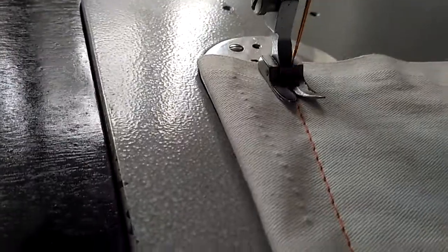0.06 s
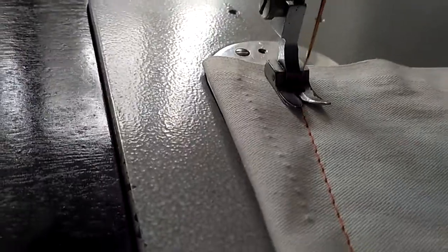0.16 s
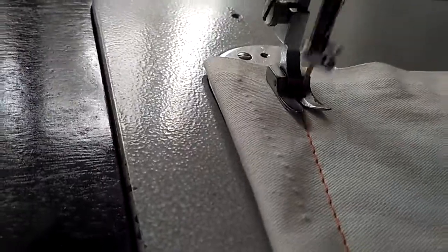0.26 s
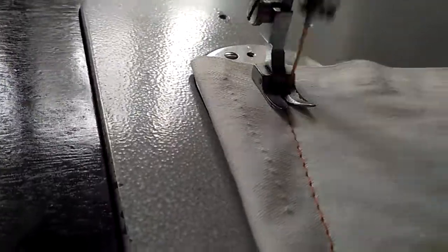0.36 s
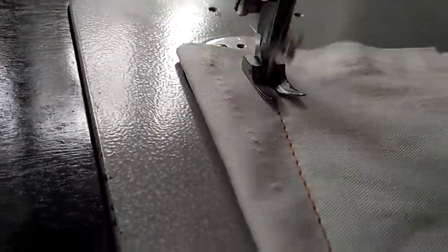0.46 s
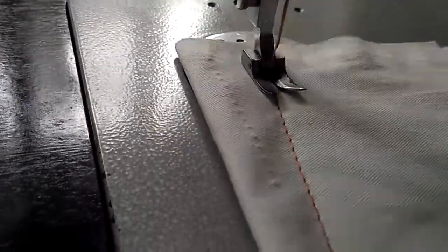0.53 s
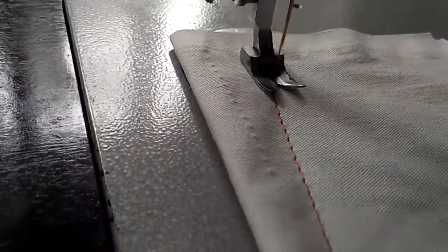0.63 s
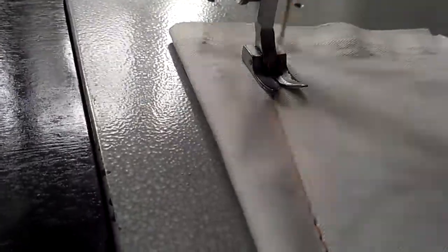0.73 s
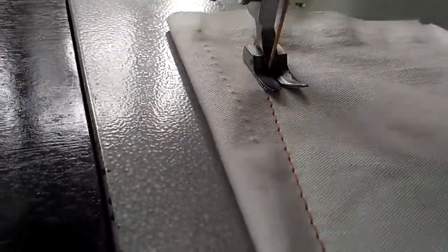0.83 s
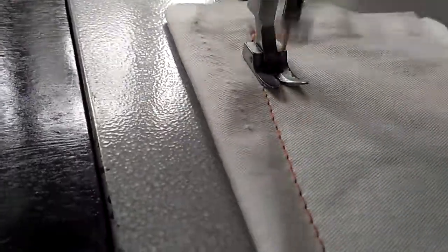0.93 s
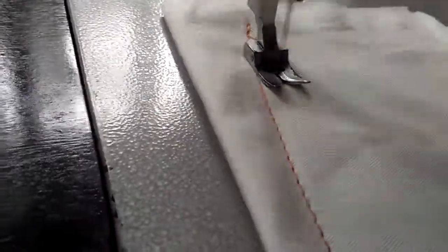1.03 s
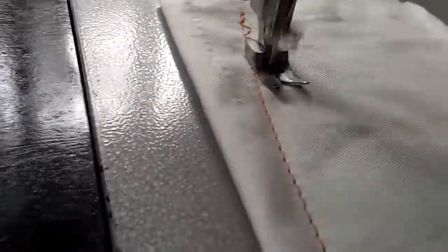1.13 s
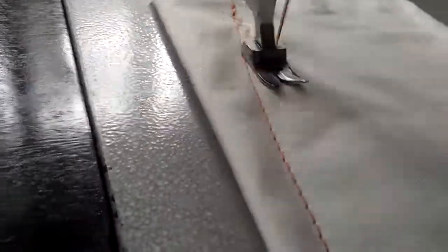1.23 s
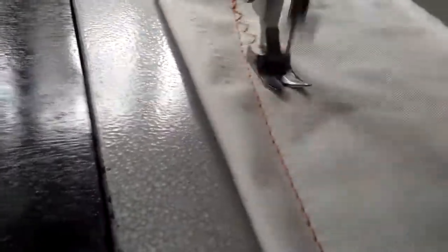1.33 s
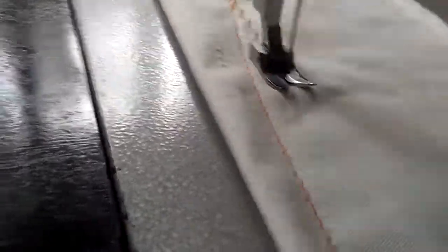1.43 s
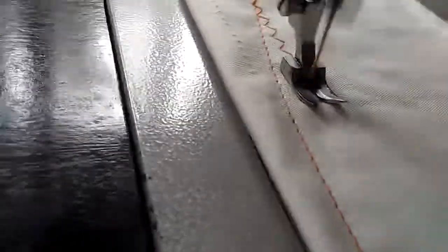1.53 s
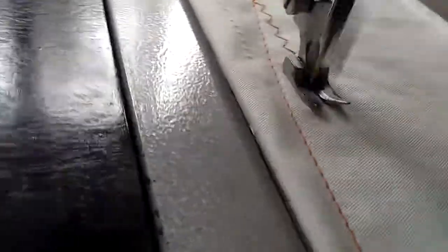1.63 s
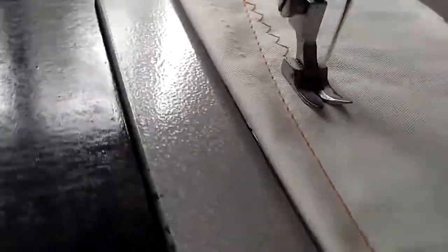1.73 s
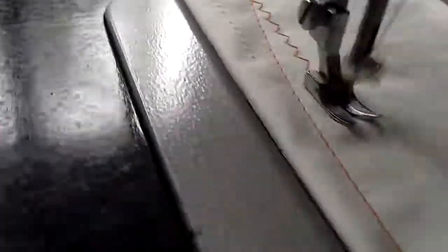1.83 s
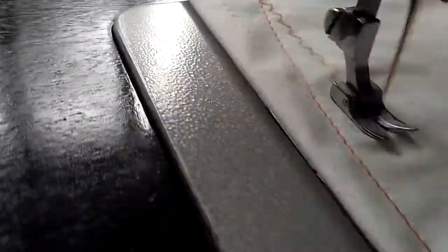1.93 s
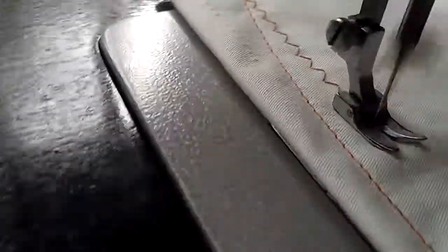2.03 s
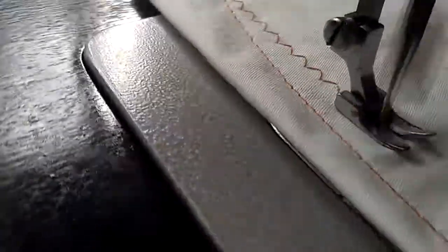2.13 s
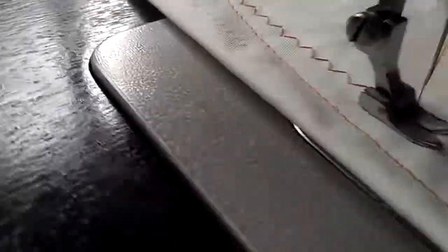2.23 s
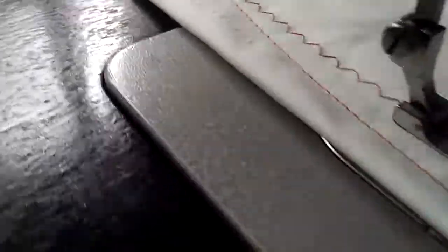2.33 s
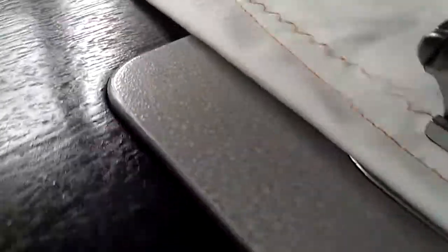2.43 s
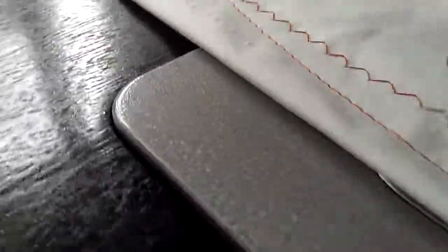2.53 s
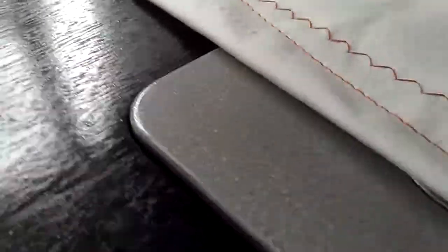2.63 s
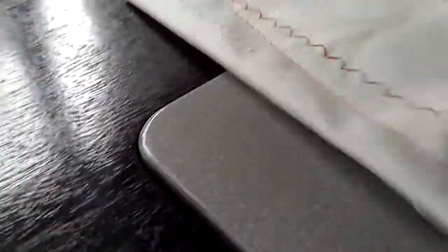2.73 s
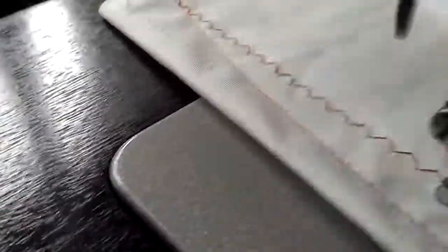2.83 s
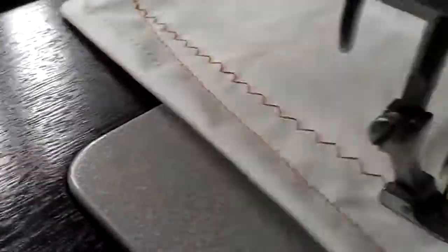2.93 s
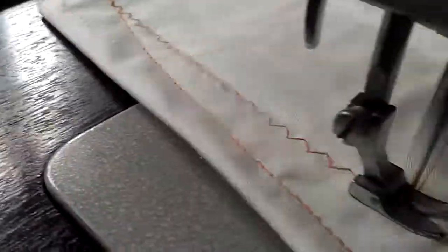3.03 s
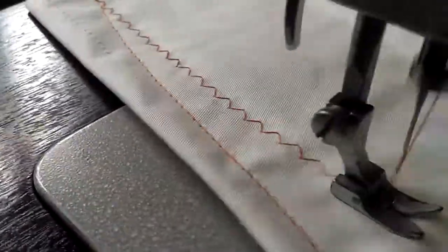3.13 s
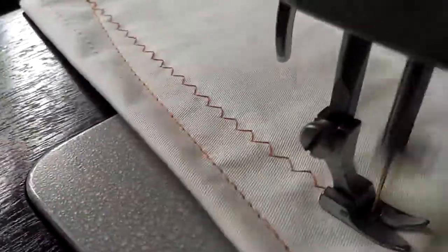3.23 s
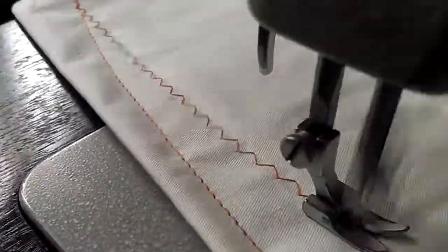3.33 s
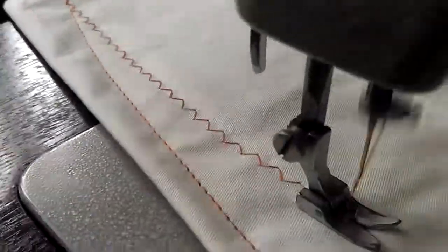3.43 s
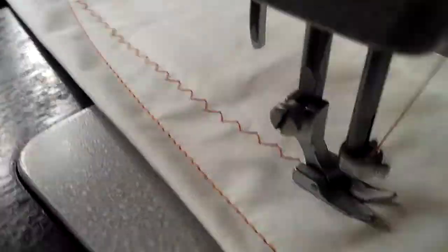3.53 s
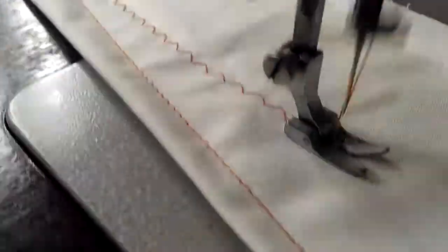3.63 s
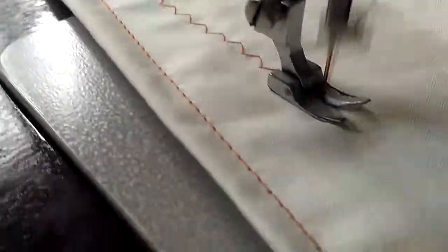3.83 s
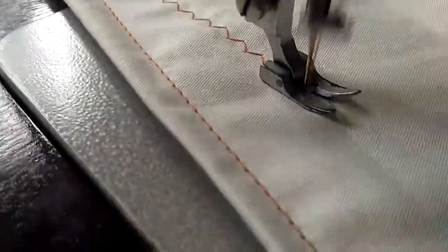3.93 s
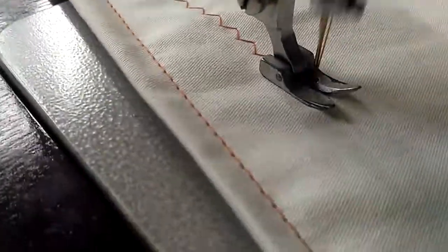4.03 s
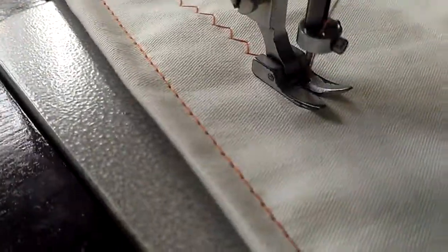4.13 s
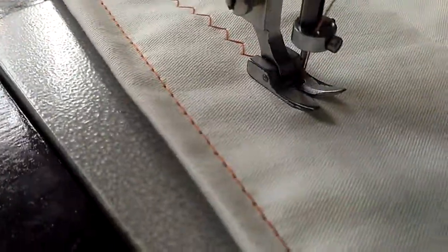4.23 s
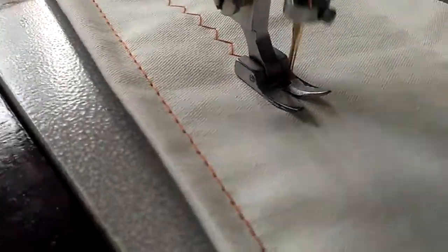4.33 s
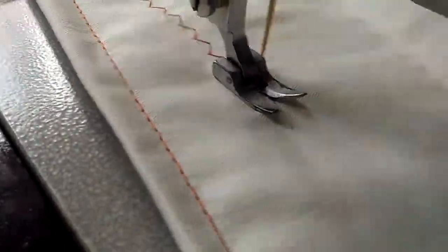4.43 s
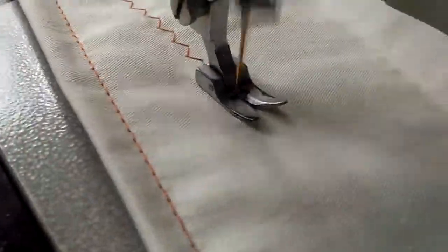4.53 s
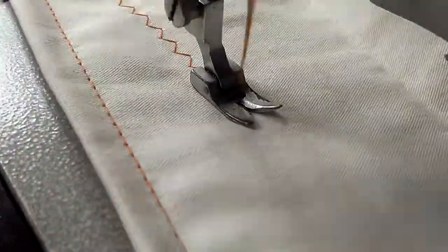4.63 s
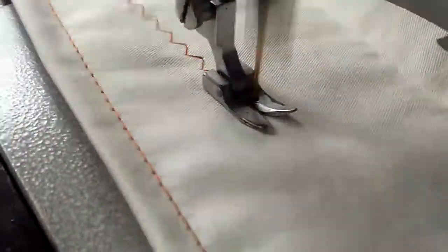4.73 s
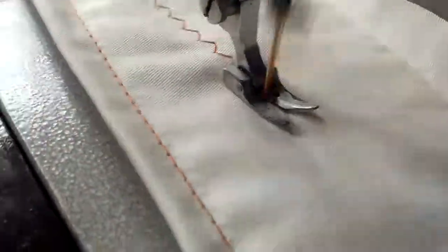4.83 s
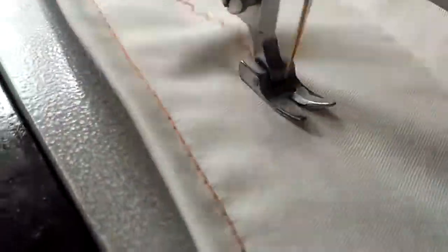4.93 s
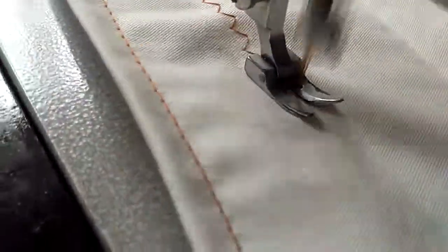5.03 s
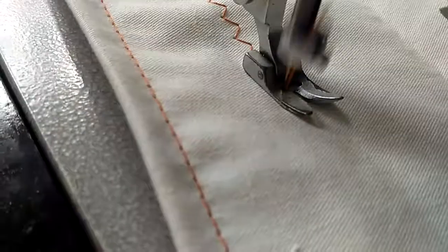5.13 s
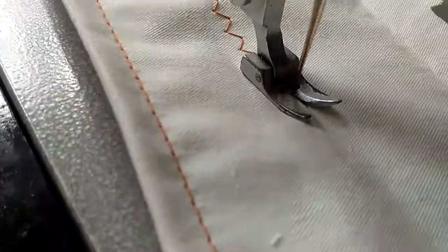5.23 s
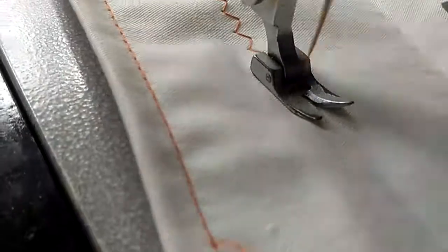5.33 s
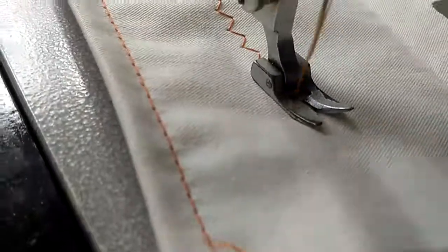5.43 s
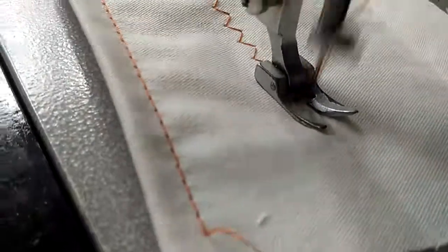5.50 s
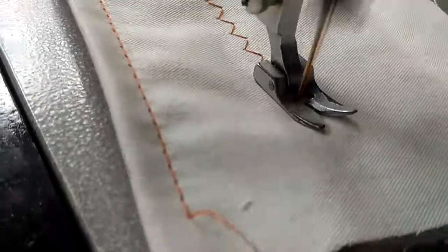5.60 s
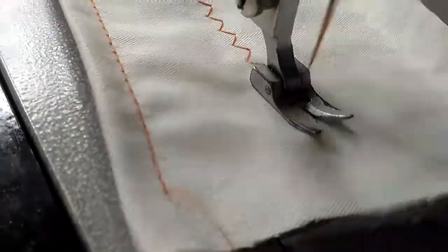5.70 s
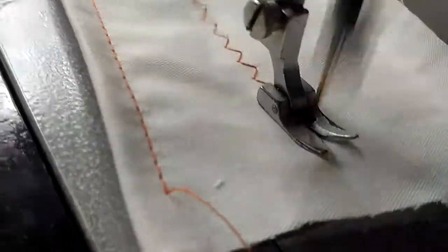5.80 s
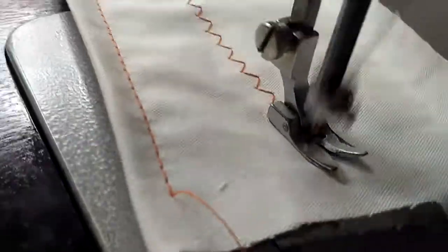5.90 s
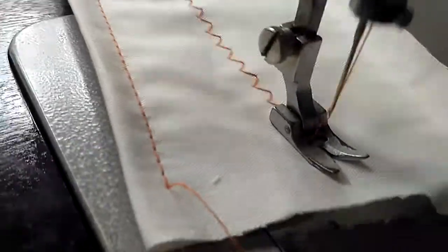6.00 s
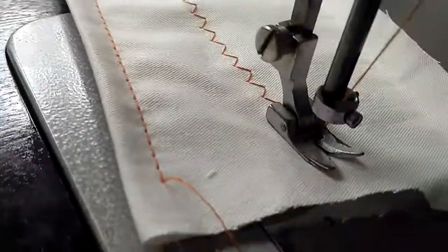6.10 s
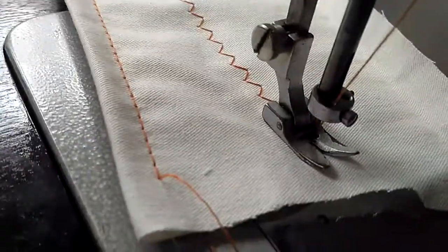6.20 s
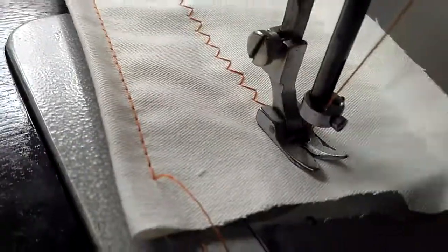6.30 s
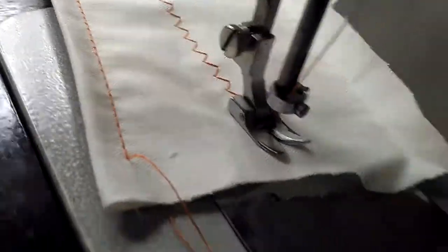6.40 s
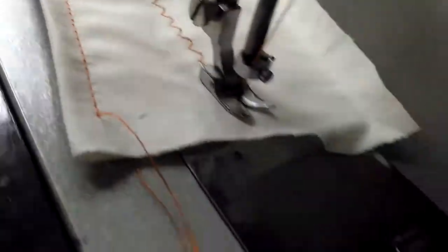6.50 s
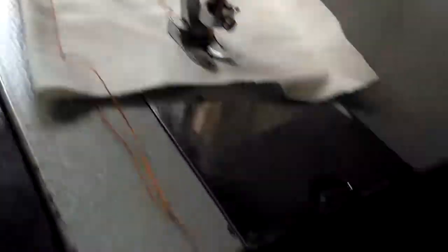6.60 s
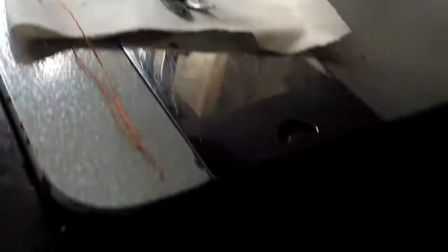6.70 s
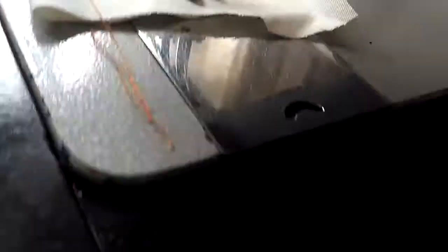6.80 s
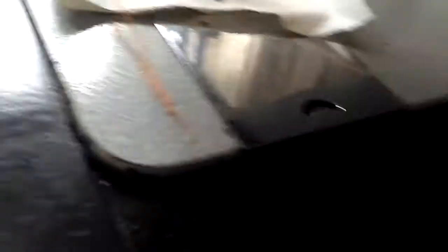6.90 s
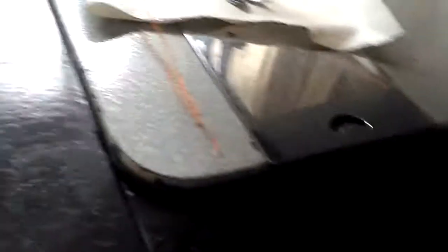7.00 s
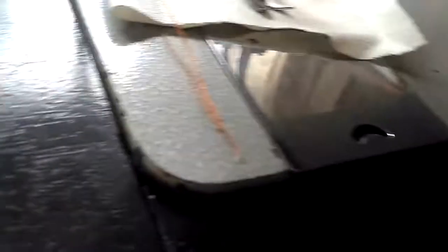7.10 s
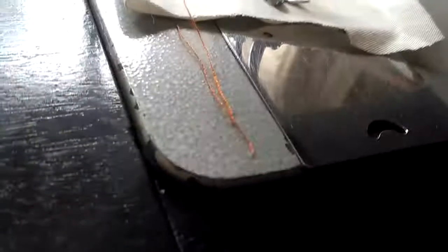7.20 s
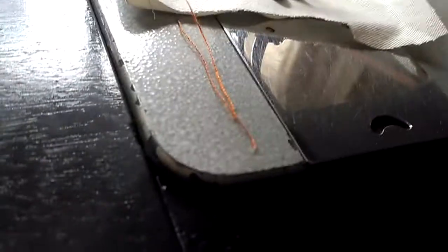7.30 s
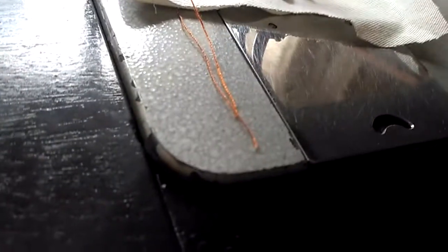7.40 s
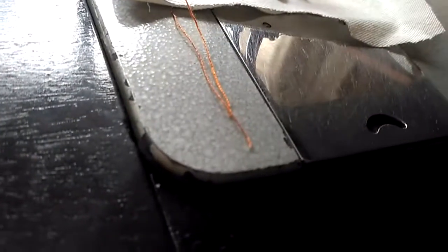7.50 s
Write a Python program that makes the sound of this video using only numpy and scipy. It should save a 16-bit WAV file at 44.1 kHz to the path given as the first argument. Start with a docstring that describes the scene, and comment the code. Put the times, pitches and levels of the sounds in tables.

```python
"""Close beside an electric sewing machine, at a hand-held phone: heavy cloth is stitched in two runs
with a short stop. Every turn of the shaft repeats a round of blows that excite the casting's modes.
Gear noise and needle bursts are modulated by the turn; the motor hums at twice the mains frequency.
Afterwards the cloth is drawn out over the bed: coloured noise with a narrow whistling band."""
import sys
import numpy as np
from scipy import signal
from scipy.fft import rfft, irfft, next_fast_len
from scipy.io import wavfile
from scipy.ndimage import uniform_filter1d, map_coordinates

SR = 44100
rng = np.random.default_rng(int(sys.argv[2]) if len(sys.argv) > 2 else 0)


def file_out(sig):
    """Save sig as 16-bit WAV at sys.argv[1]."""
    # one column per channel
    cols = np.atleast_2d(sig).T
    # limit, then scale
    lim = np.clip(cols, -1, 1)
    pcm = np.round(lim * 32767).astype(np.int16)
    wavfile.write(sys.argv[1], SR, pcm)


N = 332955
T = np.arange(N) / SR  # s

# Background colour: f/Hz, relative density/(dB per Hz)
ROOM_COLOUR = [(50, -27), (180, -3), (260, -16.5), (520, -19), (640, -13.5), (700, -4.5), (780, -17),
               (1100, -25.5), (1350, -26), (1900, -28.5), (2500, -28), (5000, -29), (7000, -40.5),
               (9500, -76)]
# Background before its random unevenness: t/s, level/dB
ROOM_LEVEL = [(0, -54), (4.201, -61), (4.33, -73), (4.45, -56), (6.301, -71), (6.6, -68), (6.82, -63),
              (6.95, -67.5), (7.545, -85)]
# Likeness of the noise at the two ports: f/Hz, correlation/1
LIKENESS = [(60, 0.87), (250, 1), (600, 0.74), (1100, 0.51), (2200, 0), (9000, 0)]
# Lean of the sound to the left: f/Hz, left-right level difference/dB
LEAN = [(60, 12.5), (190, 5), (570, 6.5), (1010, -1.5), (1780, 7.5), (3130, 4), (5500, 2), (7000, -5.5),
        (8500, -12.5)]
# Rub of the cloth: t/s, level/dB
CLOTH_LEVEL = [(6.55, -113), (6.77, -79), (6.9, -63), (6.93, -59.5), (7.0, -58.5), (7.04, -53.5),
               (7.13, -57), (7.205, -49.5), (7.28, -62.5), (7.545, -78)]
# Colour of the rubbing weave: f/Hz, relative density/(dB per Hz)
WEAVE_COLOUR = [(290, -81), (500, -33.5), (805, -3), (948, -14.5), (1130, -5.5), (2100, -3.5), (2600, 5),
                (3000, 2), (5020, 8.5), (9280, -28.5), (10000, -37.5), (13000, -64), (22000, -120)]
# Whistling band of the rub: t/s, centre f/Hz, level/dB
WHISTLE = [(6.55, 4850, -100), (6.77, 5270, -66), (6.851, 5200, -69), (7.051, 5230, -66),
           (7.281, 4750, -61.5), (7.545, 4410, -76)]
# Scrapes of the linkage at a crawl: middle t/s, width of the bell (one sigma)/s, level/dB, centre f/Hz
SCRAPES = [(0.273, 0.0078, -47, 3200), (0.343, 0.012, -42.5, 3480), (4.285, 0.01, -61.5, 2700)]
# Clicks of linkage and fingers: t/s, level before the metal's response/dB,
# t60/s (limited in use), treble raised and bass lowered by/dB
CLICKS = [(0.214, -43.5, 0.03, -3), (0.242, -40, 0.027, -3), (0.401, -29.5, 0.013, -3.5),
          (0.468, -45, 0.034, -6.5), (0.5654, -37.5, 0.031, 2), (0.596, -45, 0.034, 9),
          (3.8235, -21.5, 0.018, -1), (4.0225, -47.5, 0.074, 2.5), (4.056, -42, 0.053, -1),
          (4.133, -54, 0.075, 7), (4.2259, -48.5, 0.019, -2), (4.578, -37, 0.029, 2),
          (4.6069, -37.5, 0.11, 3.5), (5.0873, -23.5, 0.015, -1.5), (5.4198, -27.5, 0.017, -1),
          (5.4839, -36, 0.05, 3.5), (5.5414, -30.5, 0.028, -1), (5.599, -34, 0.039, 1.5),
          (5.6968, -36.5, 0.14, 5), (6.1378, -47, 0.078, 5), (6.171, -50, 0.046, 10),
          (6.251, -59, 0.048, 0), (6.442, -62.5, 0.14, 0.5), (6.928, -51, 0.21, -0.5)]
# Knocks and pings of frame and hand: t/s, level before halving and lean/dB, f/Hz, t60/s
BUMPS = [(.399, -20, 1950, 0.011), (4.023, -31, 2610, 0.046), (4.134, -31, 491, 0.091),
         (4.19, -20.5, 1910, 0.012), (6.254, -52, 1500, .04), (6.296, -46, 970, 0.046),
         (6.344, -43, 130, 0.091), (6.35, -73, 1540, 0.13), (6.398, -61, 725, .05), (6.4, -54.5, 2220, .02),
         (6.441, -54, 697, .1), (6.442, -44, 169, 0.14), (6.595, -51, 675, 0.093), (6.641, -47, 208, 0.13),
         (6.716, -39, 168, 0.1), (6.802, -25, 188, 0.063), (6.806, -32.5, 386, 0.052),
         (6.817, -29, 209, 0.069), (6.927, -48, 407, 0.12), (7.136, -48, 166, 0.097)]
# Stray pings of loose parts in the runs: t/s, level before halving and lean/dB, f/Hz
PINGS = [(1.9196, -21.5, 4530), (2.7245, -26.5, 4210), (2.896, -21.5, 2570), (2.9047, -21, 4280),
         (3.348, -24.5, 2780), (3.4416, -24.5, 4140), (4.8724, -21, 4230), (4.9762, -20, 3140),
         (5.045, -20.5, 2940), (5.1203, -22, 3200), (5.203, -25.5, 2660)]
PING_T60 = 0.052  # s
# Motor hum, one table a run: t/s, level before the final scale and lean/dB
HUM_LEVEL = [
    [(0, -60), (.15, -41.5), (.7, -38.5), (1.25, -32.5), (1.5, -40), (2.4, -48), (3.6, -50), (4.3, -66.5)],
    [(4.35, -64), (4.41, -37), (4.46, -44), (4.5, -35.5), (4.77, -29.5), (5.05, -50), (5.31, -31.5),
     (5.34, -40), (5.5, -45), (5.72, -36.5), (6.07, -40.5), (6.25, -58)],
]
# Pedal pressed, rotor not yet turning: t/s, swell time/s, reference level of the rattle/dB
STALLS = [(0, .12, -46.5), (4.365, 0.056, -48)]
# Low and high rattle of the core: level over the reference/dB, swell/dB, fade/(dB per s)
RATTLE = [(2.5, 8.5, 215), (0.5, 15, 556)]
# Low and high resonances of the core: f/Hz, t60/s, relative level/dB
CORE_MODES = [
    [(510, 0.023, 1), (935, 0.059, 10.5), (1085, 0.038, -6.5)],
    [(1696, .016, 5), (1930, 0.046, 0.5), (2040, 0.03, 3)],
]
# Shaft speed, one table a run: t/s, speed/(turns per s)
SHAFT_SPEED = [
    [(0.1, 7.056), (0.376, 6.21), (0.645, 6.572), (0.961, 12.963), (1.19, 14.745), (1.498, 15.701),
     (2.085, 15.819), (2.607, 16.267), (2.963, 16.356), (3.107, 17.813), (3.336, 16.65), (3.628, 15.978),
     (3.843, 14.67), (3.993, 12.849), (4.053, 7.301), (4.299, 1.648)],
    [(4.45, 5.4), (4.733, 8.4), (4.838, 17.52), (4.901, 12.94), (4.994, 14.32), (5.353, 10.01),
     (5.487, 6.23), (5.729, 12.13), (5.991, 12.95), (6.084, 7.45), (6.3, 0.76)],
]
# Loudness of the linkage, one table a run; sets the gains of all parts: t/s, level/dB
LINKAGE_LEVEL = [
    [(.18, -65), (.25, -47.5), (.44, -54.5), (.48, -47), (.7, -37), (1, -30.5), (1.5, -27), (2.5, -32),
     (3.1, -32), (3.7, -37.5), (4.0, -42.5), (4.1, -56.5), (4.22, -57), (4.35, -86.5)],
    [(4.55, -60), (4.61, -39), (4.87, -27), (5.12, -29), (5.33, -36), (5.5, -38.5), (5.85, -29.5),
     (6.05, -36.5), (6.12, -49), (6.2, -59), (6.3, -84)],
]
FULL_LEVEL = -35  # dB, linkage level to which the part levels refer
# Balance of the parts as the phone wanders: t/s, first drift/1, second drift/1
DRIFT = [(0.5, 0.18, -0.058), (1, 0.59, 0.11), (1.9, 0.33, 0.33), (2.15, -0.28, -0.13), (2.4, -0.34, -0.86),
         (2.749, -1.18, 0.1), (3.2, -0.63, 0.85), (3.6, -0.22, -0.37), (3.78, 1.05, -0.52),
         (3.92, 0.23, -0.24), (4.6, 0.35, -0.31), (5.1, 0.14, 0.069), (5.25, 0.27, 0.004),
         (5.8, 0.57, 0.081), (6.099, 0.63, -0.34)]
# Bed, arm, head, cover plate, hook, needle: gain at FULL_LEVEL/dB, growth/(dB per dB of linkage),
# dB per first drift, dB per second drift
PARTS = [(-28.5, 0.71, -2.5, -3.5), (-39.5, 0.8, 4.5, -3), (-41.5, 0.56, -4.5, 6.5), (-40.5, 0.82, -9, -2),
         (-37.5, 0.6, -4.5, 2.5), (-54, 1.16, 0.7, -3.5)]
# Below the steady speed the linkage moves in two lurches a turn:
# steady speed/(turns per s), depth at standstill/dB, share of the turn/1
STEADY_SPEED, LURCH_DEPTH, LURCH_SHARE = 7.1, 7.5, 0.16
# Once a turn the linkage runs unloaded and falls quiet:
# middle and width (one sigma) as shares of the turn/1, depth/dB
SLACK_SHARE, SLACK_WIDTH, SLACK_DEPTH = 0.56, 0.042, -1
# Gear noise colour: f/Hz, relative density/(dB per Hz)
GEAR_COLOUR = [(140, -24.5), (230, -6.5), (440, -29.5), (516, -3.5), (817, -11.5), (972, -5), (1330, -15),
               (3190, -10.5), (6610, -21), (9070, -59.5), (10100, -79.5), (22000, -120)]
# Needle burst colour: f/Hz, relative density/(dB per Hz)
NEEDLE_COLOUR = [(4500, 0), (6500, 4), (7400, -4), (8050, -20), (8900, -10), (10000, -39.5)]
# Casting modes: f/Hz, t60/s
CASTING_MODES = [(125, 0.0064), (339, 0.059), (517, 0.045), (976, 0.1), (1480, 0.023), (2070, 0.004),
                 (2670, 0.017), (3200, 0.0046), (3900, 0.022), (4600, 0.0039), (5500, 0.0018),
                 (7000, 0.006)]
# Blows of one turn: share of the turn/1, then relative level in each casting mode/dB
BLOWS = [(-.02, -5, -2, -2.5, -25, -0.5, 0.5, -7, -8, -10.5, -10, -3, 27.5),
         (0.134, -22, -15, -7, -20.5, 1, 4, -20.5, -16.5, 2, 0, 5.5, 20.5),
         (.29, -22, -4, -11, -24, -6, -8, -10, 3.5, 6.5, -21.5, 3.5, -11),
         (0.562, -13.5, -9, -13.5, 0.5, 0.5, 13, -10, -21.5, -24.5, -20.5, -16.5, -35),
         (0.722, -10, -21, -8.5, -7.5, -3.5, -12, -10.5, -22, -21, -24.5, 5, -15),
         (.81, -22, -1.5, -13, -3.5, 5.5, 9, -2, -1.5, 1, -3.5, 3.5, 5)]
PITCH_WANDER = 0.014  # relative scale by which each mode's frequency strays
# Place of the thump in the turn: t/s, share of the turn/1
THUMP_SHARE = [(.5, 0.45), (1.2, 0.24), (2.1, 0.28), (3.4, 0.15), (4.1, 0.2), (4.9, 0.438), (5.2, 0.39),
               (5.6, .27)]
THUMP_GROWTH = 0.57  # dB per (turn per s): the bed flexes harder the faster the shaft turns
TOP_F, BASS_F = 10300, 66  # Hz, upper band limit and bass corner of the phone


def amp(db):
    """Level to amplitude: 20 dB is a factor of ten."""
    return 10 ** (np.asarray(db) / 20)


def unit(x):
    """Normalisation to unit rms."""
    return x / np.sqrt(np.mean(np.abs(x) ** 2) + 1e-20)


def along(points, hz):
    """Interpolation of a spectrum on a logarithmic frequency axis."""
    f, value = np.transpose(points)
    return np.interp(np.log(hz + 1), np.log(f + 1), value)


def levels(tables):
    """Envelope: sum of the tables' amplitudes, at -120 dB outside each table."""
    gain = np.zeros(N)
    for table in tables:
        t, db = np.transpose(table)
        gain += amp(np.interp(T, t, db, -120, -120))
    return gain


def wobble(rate):
    """Band-limited fluctuation: a smooth curve through random knots, rate knots a second."""
    knots = rng.standard_normal(int(N * rate / SR) + 4)
    return map_coordinates(knots, [np.arange(N) * rate / SR])


def filtered(x, response):
    """Linear filtering: the spectrum times a response of frequency."""
    m = next_fast_len(N + 8192)
    return irfft(rfft(x, m) * response(np.fft.rfftfreq(m, 1 / SR)), m)[..., :N]


def sides(db):
    """Interaural-style level difference: left and right gains db apart."""
    return amp(np.array([db / 2, -db / 2]))


def rush(colour, pair):
    """Partial coherence: two noises, coloured, mixed to the ports' likeness and lean; mid rms 1."""
    def turn(hz):
        return np.arccos(np.clip(along(LIKENESS, hz), -1, 1)) / 2

    def mix(hz):
        return amp(along(colour, hz)) * [np.cos(turn(hz)), np.sin(turn(hz))]

    mid, side = filtered(pair, mix)
    both = filtered(np.array([mid + side, mid - side]), lambda hz: sides(along(LEAN, hz)))
    return both / np.std(both.mean(0))


def patchy(patchy_db):
    """Non-stationary noise: two noises uneven in shared patches of pitch and time."""
    z = signal.stft(rng.standard_normal((2, N)), nperseg=512)[2]
    field = uniform_filter1d(rng.standard_normal(z.shape[1:]), size=4, axis=0)
    field = uniform_filter1d(field, size=10, axis=1)
    return signal.istft(z * amp(patchy_db * unit(field)), nperseg=512)[1][:, :N]


def ring(drive, hz, t60, rise, wander=0):
    """Modal resonance: a complex drive through a decay and an onset of rise seconds, phase drifting."""
    for decay in (np.log(1000) / t60, 1 / rise):
        drive = signal.lfilter([1], [1, -np.exp((2j * np.pi * hz - decay) / SR)], drive)
    return (drive * np.exp(1j * wander)).real


def shaft_speed():
    """Angular speed of the shaft in turns per second, interpolated through both runs."""
    return np.interp(T, *np.vstack(SHAFT_SPEED).T)


def turns():
    """Integration of speed to angle: a turn starts where the angle of a run passes a whole number."""
    starts = []
    for run in SHAFT_SPEED:
        angle = np.cumsum(np.interp(T, *np.transpose(run), 0, 0)) / SR
        starts.append(np.interp(np.arange(1, angle[-1]), angle, T))
    start = np.concatenate(starts)
    return start, np.clip(np.diff(start, append=8), 0, .15)  # lengths in s


def turn_count():
    """Shaft phase: the count of turns with their fractions, by interpolation between turn starts."""
    start = turns()[0]
    return np.interp(T, start, np.arange(len(start)))


def parts():
    """Level scaling: bed, arm, head, plate, hook, needle follow the linkage, given last, and the drift."""
    level = 20 * np.log10(levels(LINKAGE_LEVEL))
    t, first, second = np.transpose(DRIFT)
    first, second = np.interp(T, t, first), np.interp(T, t, second)
    gains = [amp(db + growth * (level - FULL_LEVEL) + a * first + b * second)
             for db, growth, a, b in PARTS]
    slowness = np.clip(1 - shaft_speed() / STEADY_SPEED, 0, 1)
    lurch = LURCH_DEPTH * slowness * np.cos(4 * np.pi * (turn_count() - LURCH_SHARE))
    return gains + [amp(level + lurch)]


def room():
    """Background noise: faint and uneven beneath the whole scene."""
    level = np.interp(T, *np.transpose(ROOM_LEVEL)) + 3 * wobble(20)
    return amp(level) * rush(ROOM_COLOUR, patchy(patchy_db=4.5))


def cloth():
    """Friction noise: the weave rubs over the bed, and a narrow band of it whistles."""
    t, hz, db = np.transpose(WHISTLE)
    phase = 2 * np.pi * np.cumsum(np.interp(T, t, hz)) / SR
    # slow noise on a gliding carrier gives a narrow band
    whistle = np.array([wobble(600), wobble(600)]) * np.cos(phase) * sides(7)[:, None]
    grain = amp(0.52 * wobble(150))
    rub = rush(WEAVE_COLOUR, grain * patchy(patchy_db=2.9)) * sides(1.2)[:, None]
    return levels([CLOTH_LEVEL])[0:] * rub + levels([np.c_[t, db]]) * unit(whistle)


def scrapes():
    """Band-limited friction: grainy noise about an octave wide under bell-shaped envelopes."""
    out = np.zeros((2, N))
    grit = amp(3.3 * wobble(270)) * rng.standard_normal((2, N))
    for middle, width, db, hz in SCRAPES:
        at = slice(round((middle - .1) * SR), round((middle + .1) * SR))
        octave = signal.butter(3, [hz / 1.35, hz * 1.35], "bandpass", fs=SR, output="sos")
        band = signal.sosfilt(octave, grit[:, at])
        out[:, at] += amp(db) * unit(band) * np.exp(-.5 * ((T[at] - middle) / width) ** 2)
    return out * sides(2.2)[:, None]


def tilted(x, db):
    """Spectral tilt: below about 3500 Hz lowered by db, above it raised by db."""
    low = signal.lfilter(*signal.butter(2, 3500, fs=SR), x)
    return low * amp(-db) + (x - low) * amp(db)


def metal(hz):
    """Resonant transmission: a rising response plus peaks at some casting modes."""
    peaks = sum(.8j * hz * 400 / (f * f - hz * hz + 400j * hz)
                for f, _ in CASTING_MODES[2::3] + CASTING_MODES[5:6])
    return 3.0 * hz / (hz + 900) + peaks


def clicks():
    """Impulsive excitation: dying noise puffs ring the metal; bumps and pings are damped sines."""
    puff, thud = np.zeros((2, N + SR)), np.zeros(N + SR)
    t = np.arange(SR // 10) / SR
    for at, db, t60, tilt_db in CLICKS:
        decay = amp(db - 60 * t / np.clip(t60, .004, .2))
        noise = rng.standard_normal((2, len(t)))
        puff[:, round(at * SR):][:, :len(t)] += decay * tilted(noise, tilt_db)
    for at, db, hz, t60 in BUMPS + [(*ping, PING_T60) for ping in PINGS]:
        decay = amp(db - 60 * t / max(t60, .004))
        onset = np.minimum(hz * t / 2, 1)  # over two cycles
        thud[round(at * SR):][:len(t)] += decay * np.sin(2 * np.pi * hz * t) * onset / 2

    def response(hz):
        return metal(hz) * sides(along(LEAN, hz)) / (1 + (hz / 6400) ** 12)

    return filtered(puff[:, :N], response) + thud[:N] * sides(7.5)[:, None]


def stall_envelope(over, swell_db, fade):
    """Growth and decay: the rattle swells at each stall, then fades at a constant dB rate."""
    out = np.zeros(N)
    for start, swell, db in STALLS:
        since = T - start
        drop = np.where(since < swell, swell_db * (1 - since / swell), fade * (since - swell))
        out += (since >= 0) * amp(db + over - drop.clip(0, 200))
    return out


def motor():
    """Magnetic forcing: the field hums near 100 Hz; in a stall the core rattles once a hum cycle."""
    phase = 2 * np.pi * np.cumsum(99 + 0.32 * wobble(11)) / SR
    hum = levels(HUM_LEVEL) * amp(2.5 * wobble(21)) * np.sqrt(2) * np.sin(phase)
    ticks = np.diff(phase // (2 * np.pi), prepend=0) * amp(2.0 * wobble(64))
    ticks = ticks + 0.064 * rng.standard_normal((2, N))
    out = hum * sides(6.5)[:, None] / 1.19
    for setting, modes in zip(RATTLE, CORE_MODES):
        core = sum(amp(db) * unit(ring(ticks, hz, t60, rise=0.00044)) for hz, t60, db in modes)
        out += stall_envelope(*setting) * unit(core)
    return out


def slack():
    """Load modulation: the linkage is briefly unloaded, and quieter, once in every turn."""
    share = turn_count() % 1
    return amp(SLACK_DEPTH * np.exp(-.5 * ((share - SLACK_SHARE) / SLACK_WIDTH) ** 2))


def gears():
    """Amplitude modulation: gear noise swells with the turn; the needle rips the weave in bright bursts."""
    turn = turn_count()
    grain = 0.73 * np.cos(2 * np.pi * (turn - .02)) + 1.5 * np.cos(6 * np.pi * (turn - .27))
    grain = amp(grain + 1.92 * wobble(300) + 1.8 * wobble(30))
    rip = 6.8 * np.cos(2 * np.pi * (turn + .01)) + 2.4 * np.cos(4 * np.pi * turn)
    rip = amp(rip + 3.9 * wobble(400))
    *_, needle, linkage = parts()
    mesh = rush(GEAR_COLOUR, unit(grain) * rng.standard_normal((2, N)))
    burst = rush(NEEDLE_COLOUR, unit(rip) * rng.standard_normal((2, N)))
    return linkage * amp(-5) * mesh + needle * amp(5.5) * burst


def casting():
    """Modal superposition: each turn's blows and a steady bearing chatter ring the casting's modes."""
    (start, length), blows = turns(), np.array(BLOWS)
    jitter = .002 * rng.standard_normal((len(start), len(blows)))
    blow_time = start[:, None] + length[:, None] * (blows[:, 0] + jitter)
    at_blow = np.round(blow_time * SR).astype(int)
    bed, arm, head, plate, hook, needle, linkage = parts()
    # one gain for each mode, in the order of the mode table
    gains = [bed * amp(-10.5), arm, head, plate, hook * amp(-15.5), hook * amp(-15.5)]
    gains += [linkage * amp(db) for db in (-16.5, -16.0, -22.0, -21.0, -20)]
    gains += [needle * amp(-7.0)]
    out = np.zeros((2, N))
    for k, (hz, t60) in enumerate(CASTING_MODES):
        size, angle, slip, late = rng.standard_normal((4,) + at_blow.shape)
        # each part takes up the blow at its own instant
        at = at_blow + np.round(.0003 * SR * late).astype(int)
        rise = .0006 + .6 / hz
        chatter_db = -41 if 900 < hz < 4000 else -37
        noise = rng.standard_normal((2, N)) + 1j * rng.standard_normal((2, N))
        drive = amp(chatter_db + 4 * wobble(60)) * noise
        like = np.clip(along(LIKENESS, hz), 0, 1)
        drive[1] = like * drive[0] + np.sqrt(1 - like ** 2) * drive[1]
        # the two ports hear each blow at phases that part more in the treble
        apart = np.arccos(like) + .5 * (1 - like) * slip
        # a blow lands nearly in step with the ringing cover plate, loosely so with the other parts
        step = 2 * np.pi * hz * at / SR + (.2 if k == 3 else 1.1) * angle
        # the heavy parts answer evenly, the light ones by chance
        scatter_db = 1.2 if hz < 1200 else 2.2
        # at a crawl the blows hold no treble
        sounds = (hz <= 1800) | (length[:, None] <= .12)
        strength = sounds * amp(blows[:, k + 1] + scatter_db * size)
        drive[:, at] += strength * np.exp(1j * (step + np.array([apart, -apart]) / 2))
        # scale by the level between 1 s and 3 s
        norm = np.std(ring(drive.mean(0), hz, t60, rise)[SR:3 * SR])
        wander = 2 * np.pi * np.cumsum(hz * PITCH_WANDER * wobble(9)) / SR
        mode = ring(drive * gains[k], hz, t60, rise, wander) / norm
        out += mode * sides(along(LEAN, hz))[:, None]
    return out


def thump():
    """Inertial reaction: the needle bar's reversal flexes the bed in a few low cycles rising in pitch."""
    out, (start, length) = np.zeros(N + SR), turns()
    t = np.arange(-1600, 1600) / SR
    bell = np.exp(-.5 * (t / np.where(t < 0, .0065, .0068)) ** 2)
    bed = parts()[0] * amp(THUMP_GROWTH * (shaft_speed() - 17.5))
    thump_time = start + length * np.interp(start, *np.transpose(THUMP_SHARE))
    for at, (size, angle) in zip(thump_time, rng.standard_normal((len(start), 2))):
        push = bell * np.cos(2 * np.pi * (145 + 600 * t) * t + 0.13 * angle)
        out[round(at * SR) - 1600:][:len(t)] += bed[round(at * SR)] * amp(12 + .8 * size) * push
    return out[:N] * sides(5.5)[:, None] / 2.0


def scene():
    """Superposition of all sources, from the background to the machine."""
    machine = slack() * (gears() + casting()) + thump()
    return room() + cloth() + scrapes() + clicks() + motor() + machine


def record(dry):
    """Band limitation: the phone cuts deep bass and all above its limit, then adds a trace of hiss."""
    band = filtered(dry, lambda hz: (hz < TOP_F) * hz ** 3 / (hz ** 3 + BASS_F ** 3))
    return band + amp(-106) * rng.standard_normal((2, N))


dry = scene()
out = record(dry)
file_out(out)
```